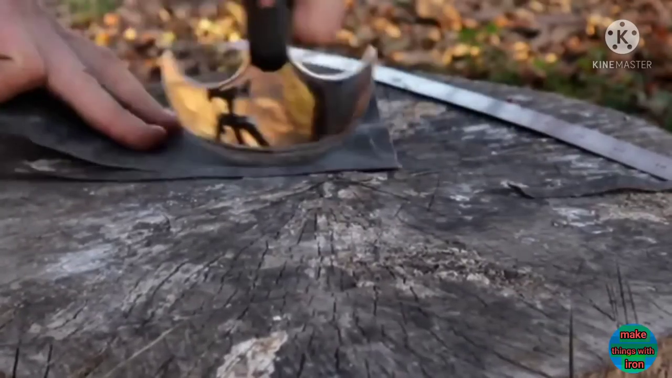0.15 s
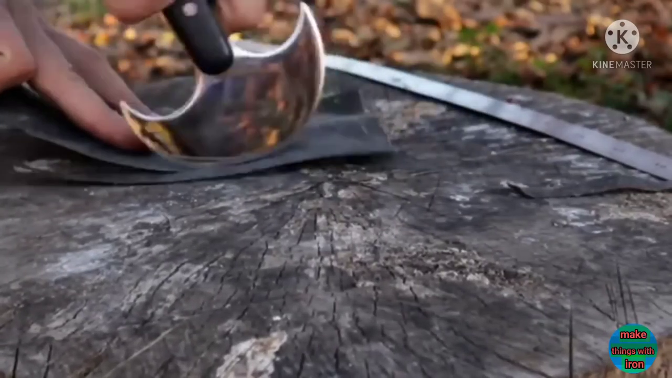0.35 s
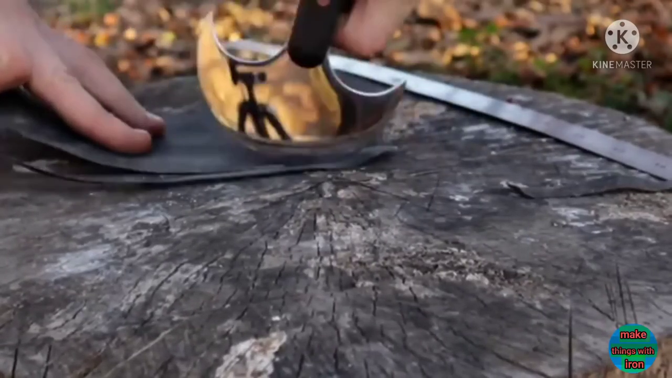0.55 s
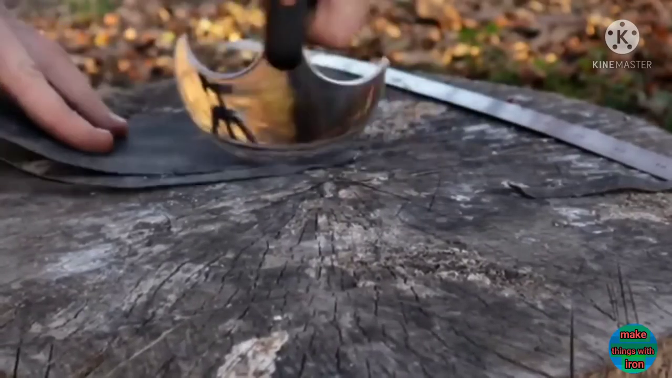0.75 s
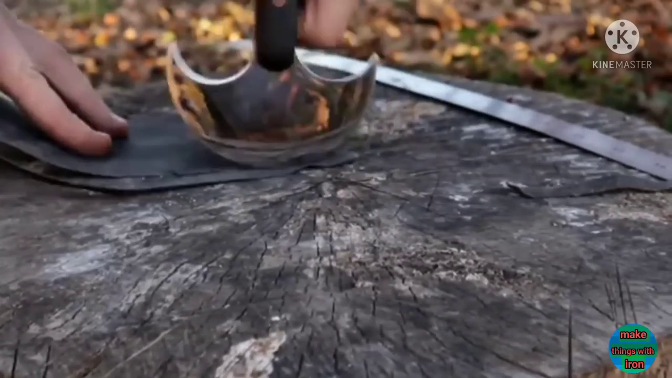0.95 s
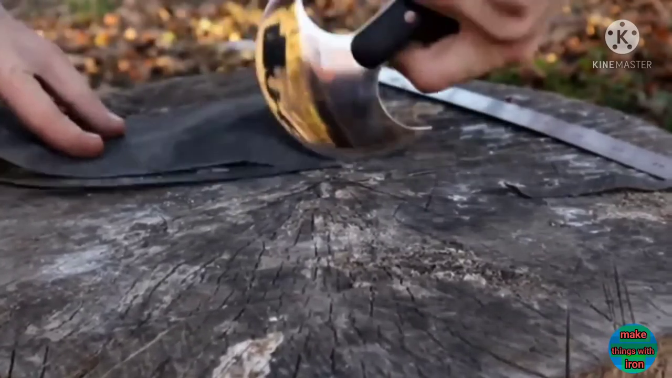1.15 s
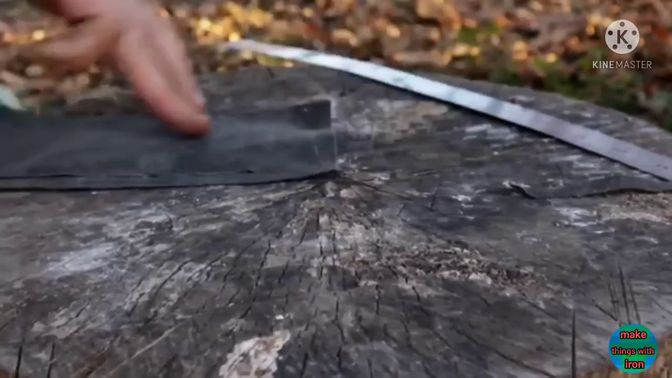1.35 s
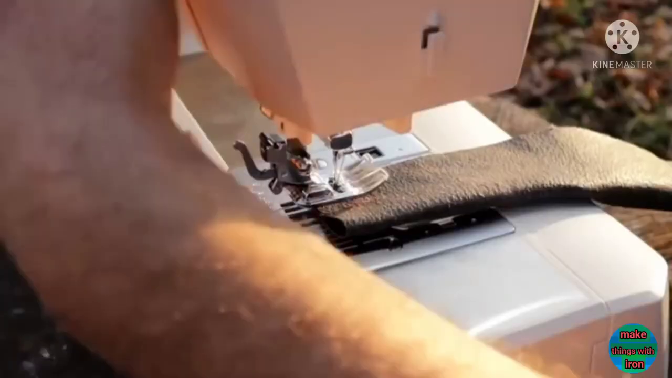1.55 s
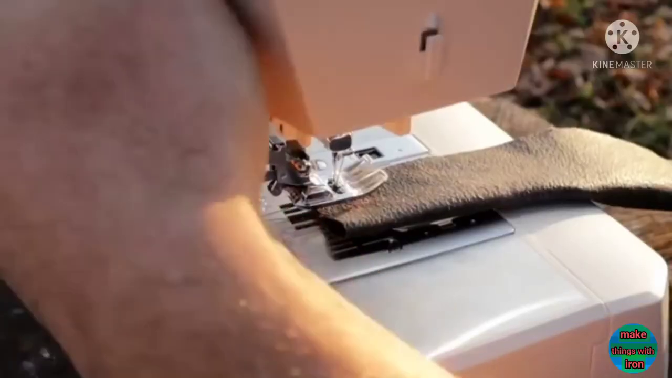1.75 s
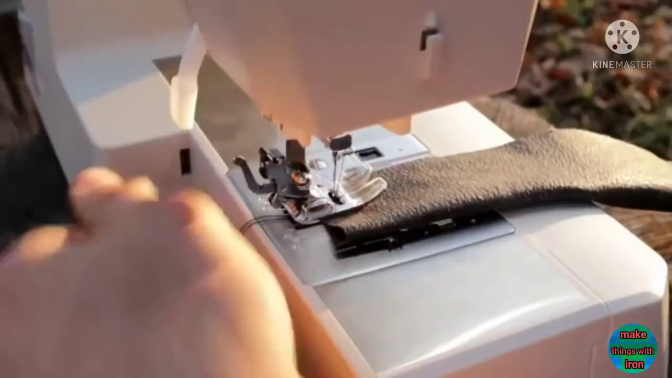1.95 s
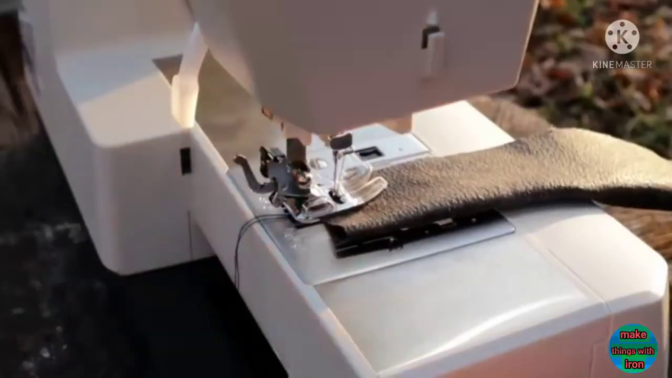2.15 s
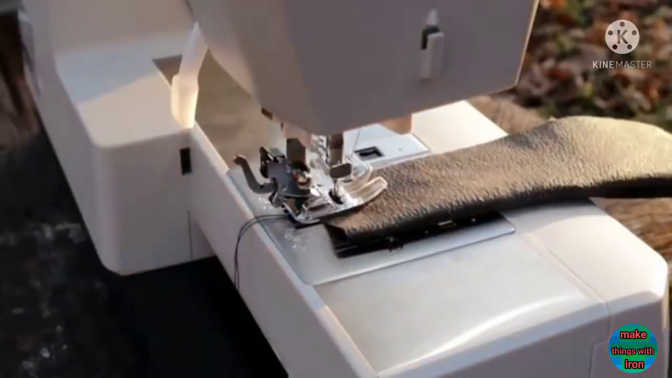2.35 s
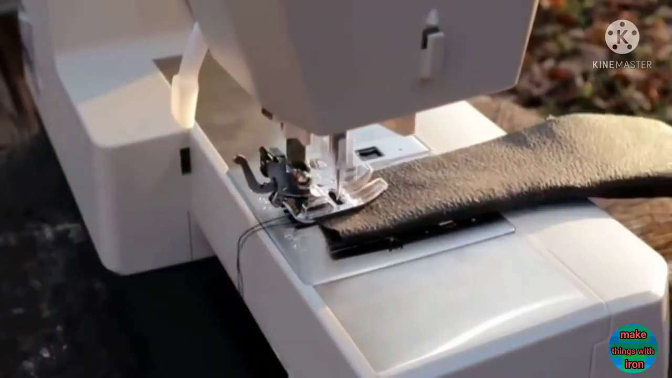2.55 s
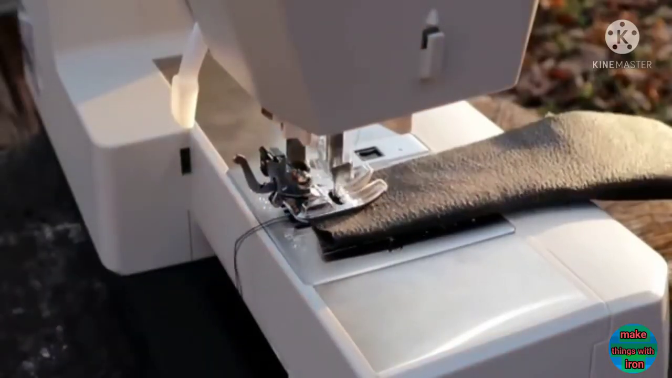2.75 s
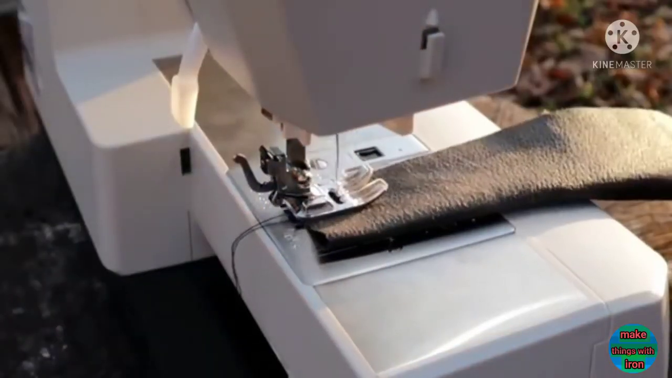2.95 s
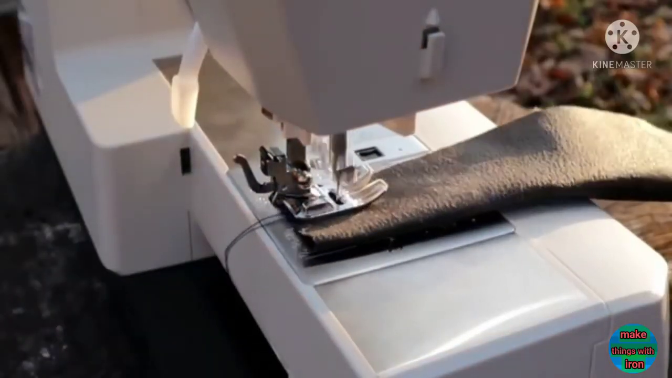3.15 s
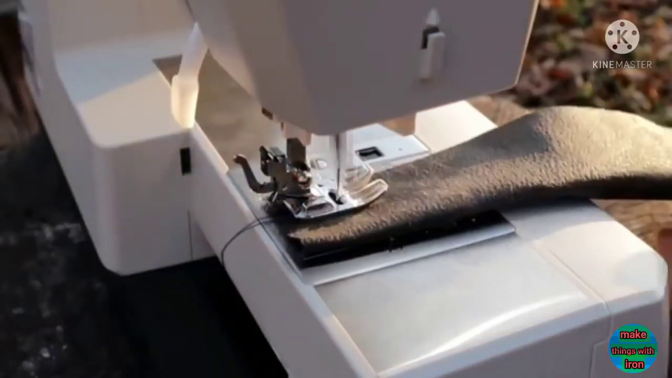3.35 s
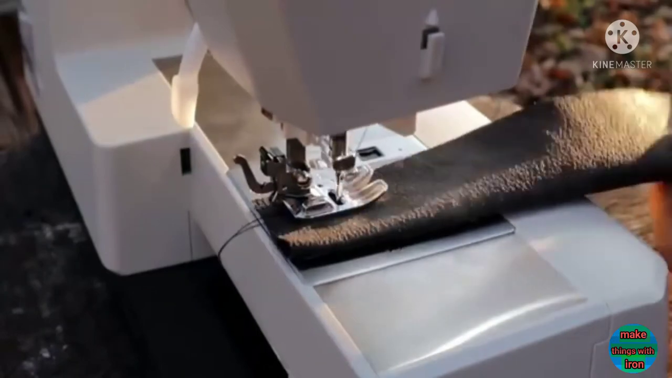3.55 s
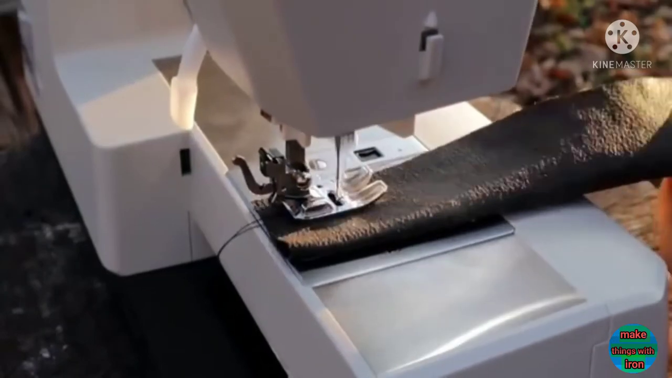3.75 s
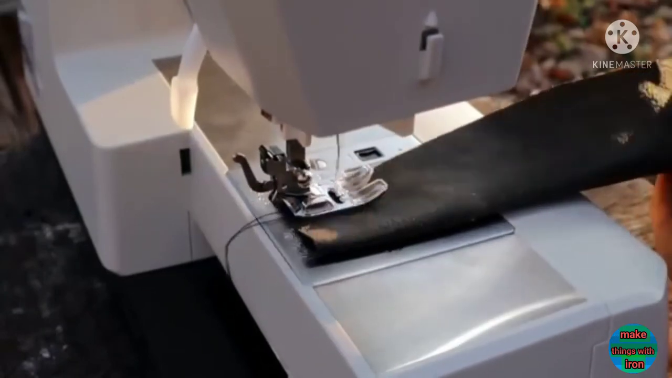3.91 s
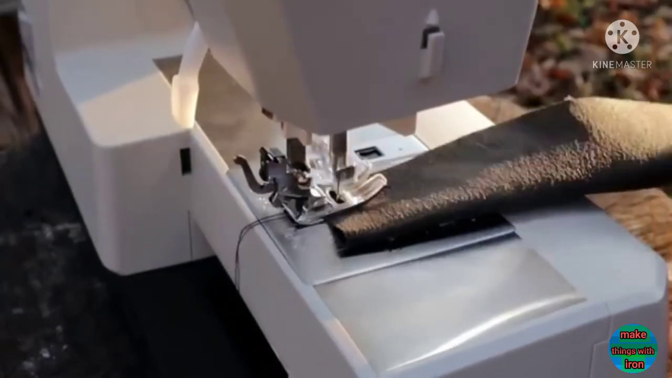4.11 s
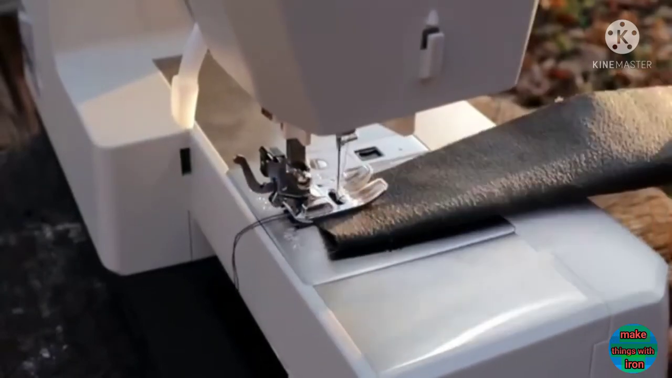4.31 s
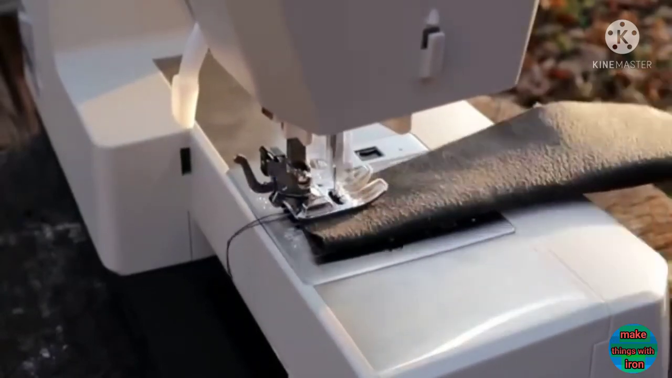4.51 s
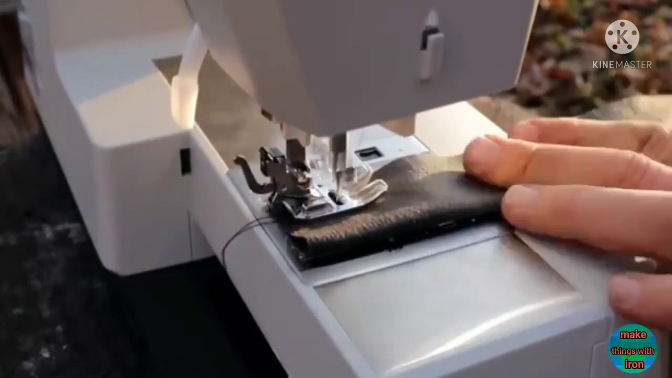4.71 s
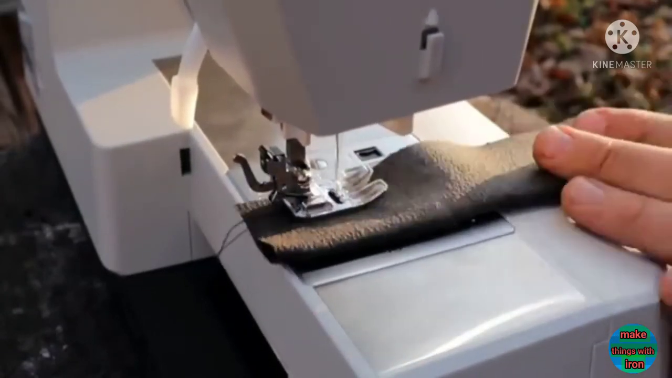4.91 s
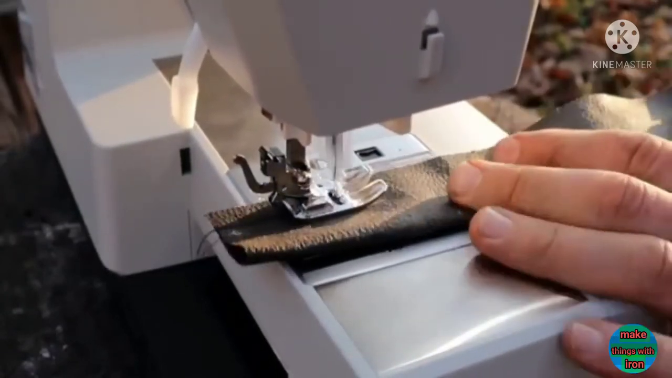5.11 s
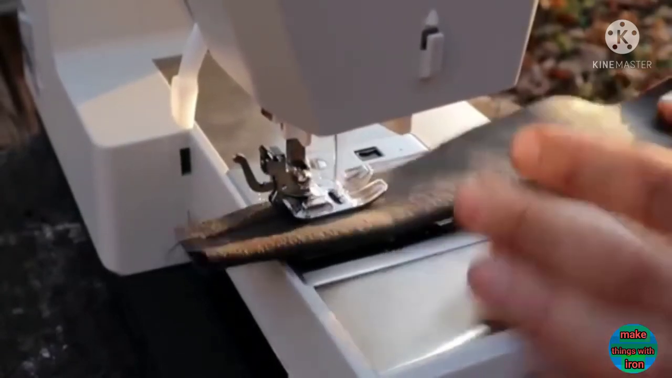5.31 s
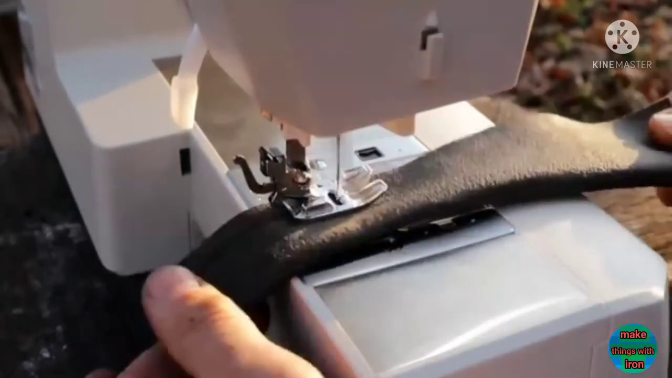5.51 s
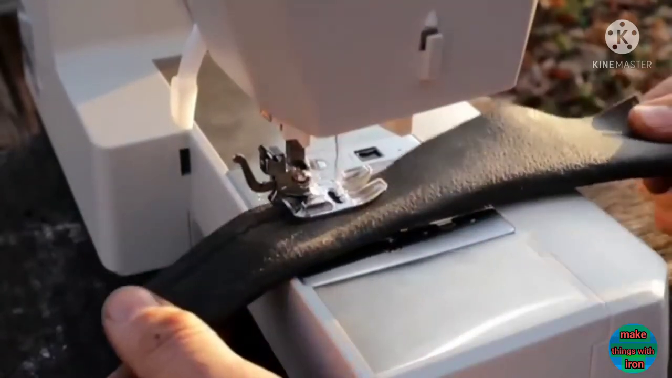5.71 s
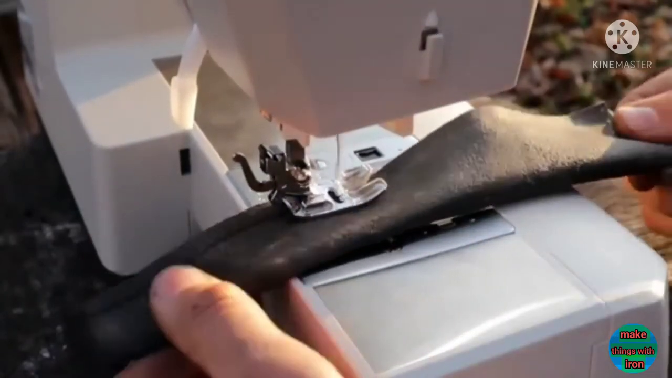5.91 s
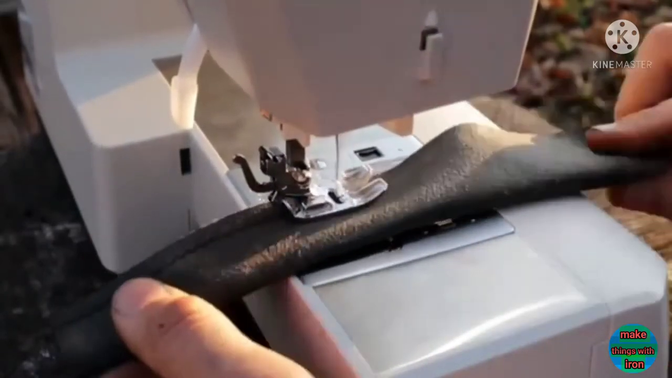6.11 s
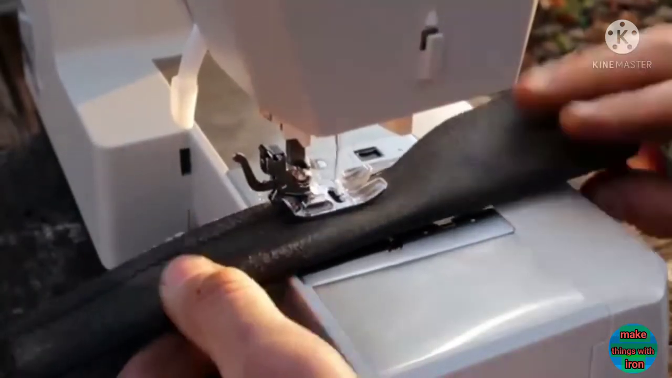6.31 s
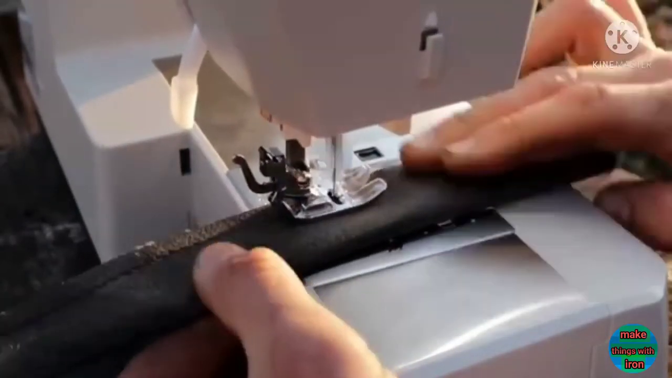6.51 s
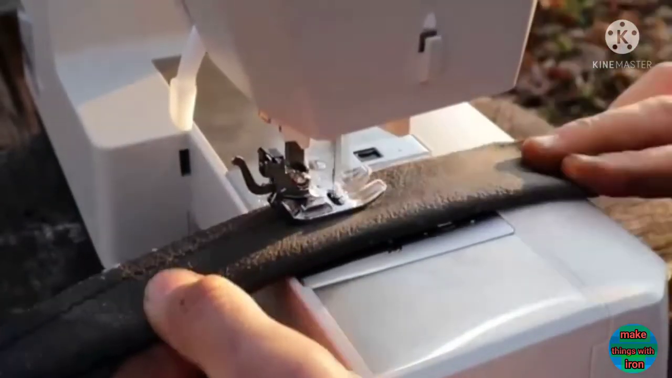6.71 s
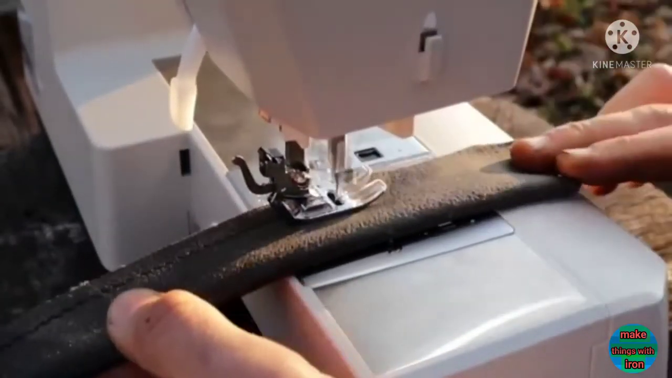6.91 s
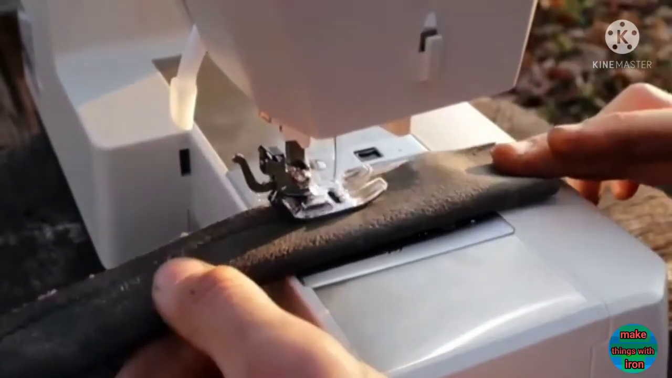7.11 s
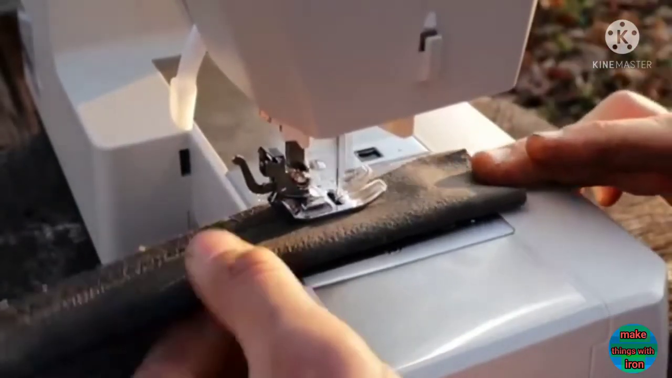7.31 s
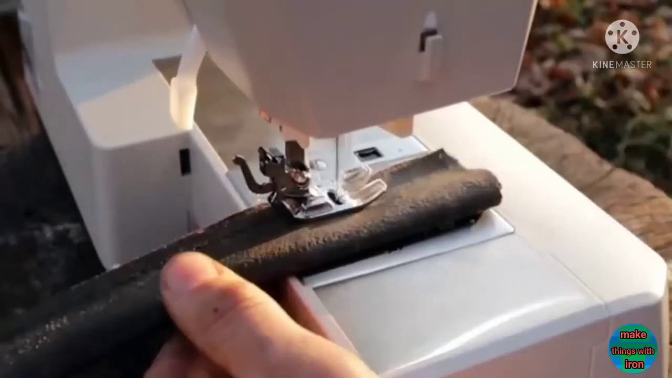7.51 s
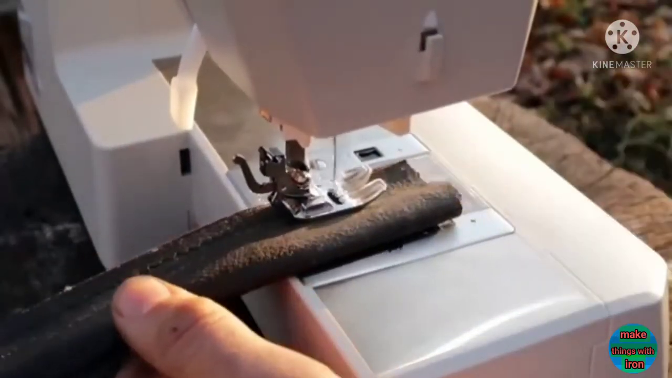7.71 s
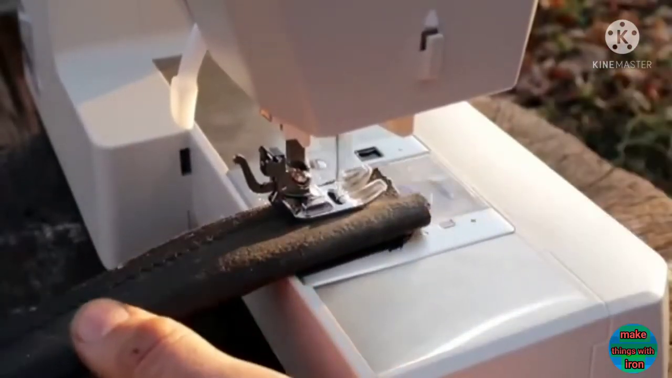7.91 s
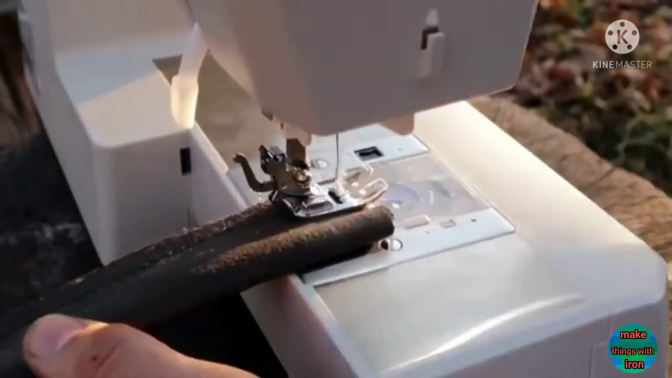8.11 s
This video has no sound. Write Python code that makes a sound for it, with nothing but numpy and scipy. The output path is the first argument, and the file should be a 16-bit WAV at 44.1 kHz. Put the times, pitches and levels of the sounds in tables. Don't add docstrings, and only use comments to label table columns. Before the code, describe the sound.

From 0 to 1.45 seconds, a blade makes quiet, grainy scrapes through leather, with small dry fibre snaps near 0.4 and 1.2, over soft outdoor hiss and distant rumble. A tiny falling bird chirp comes at 0.1. Then a faint far engine drones while hands tap and slide on plastic and leather rustles around 1.7-1.8. At 2.0 a presser lever snaps loudly in a quick hollow metal cluster. At 2.4 a sewing machine motor growls, rises and settles into whirring, throbbing clatter with sharp regular ticks, slowing at 3.6 and ending in a bright knock at 3.72. A second, shorter run lasts from 3.82 to about 4.3, with a strong knock at 4.25. After a brief restart at 4.46, the sound jumps at 4.54 to a sped-up run: dense, bright, higher-pitched rattling and a steady whine, stepping up slightly near 5.3 and continuing to 8.25.

```python
import sys
import numpy as np
from scipy import signal
from scipy.fft import rfft, irfft, next_fast_len
from scipy.io import wavfile
from scipy.ndimage import uniform_filter1d, map_coordinates

SR = 44100
rng = np.random.default_rng(int(sys.argv[2]) if len(sys.argv) > 2 else 0)


def gain_from_db(level_db):
    decades = np.asarray(level_db, float) / 20
    return 10 ** decades


def materialize(psi):
    bounded = np.clip(np.atleast_2d(psi).T, -1, 1)
    quanta = np.round(bounded * 32767).astype(np.int16)
    wavfile.write(sys.argv[1], SR, quanta)


N = 364266
KNIFE_END_S = 1.46
MACHINE_START_S = 2.4
FAST_START_S = 4.535
FAST_FACTOR = 2.332
TOP_HZ = 15020
FULL_EFFORT_DB = -28

# (pitch_hz, level_db)
RUMBLE_TONE = [(12, -31), (20, -9), (43, 0), (152, 5), (300, -2), (390, -6), (660, -120)]
HISS_TONE = [(120, -51), (200, -1.5), (572, 1.5), (933, -2), (1370, -2), (4050, -7.5), (7630, -14.5),
             (10000, -17), (13900, -16), (15200, -34)]
# (pitch_hz, likeness from -1 to 1)
LEFT_RIGHT_LIKENESS = [(60, 0.93), (180, 0.9), (550, -0.096), (1650, -0.097), (4970, -0.34), (15000, -0.69)]
# (time_s, level_db)
AIR_GAIN = [(0, 2), (.5, 1), (1.7, 2.5), (2.37, 3.5), (2.47, -11), (3.5, -14), (3.7, 1), (3.85, -4.5),
            (4.25, -18), (4.42, -7), (5.1, -9), (6, -7.5), (8.26, -10.5)]
# (time_s, pitch_hz, level_db)
FAR_ENGINE = [(1.46, 109.7, -68), (1.5, 113, -56), (1.7, 114, -65), (2.15, 115.7, -60), (2.39, 112, -71)]
# (time_s, pitch_hz, level_db)
CHIRP_PITCH = [(.09, 6730, -68), (.104, 6400, -54), (.116, 5950, -51), (.126, 5400, -52), (.142, 5000, -55),
               (.156, 4800, -64)]

# (start_s, level_db,
# pitch_hz)
BED_TAPS = [(1.807, -27, 1160), (1.81, -28, 850), (1.9978, -15, 1200), (2.0465, -24, 500),
            (2.294, -44, 480), (2.298, -41, 334), (2.302, -48, 720), (1.808, -30, 2070),
            (5.383, -44, 407), (5.383, -26.5, 1340), (5.83, -27, 519), (5.83, -25.5, 760)]
# (peak_s, length_s, level_db)
PALM_SLIDES = [
    (1.64, 0.02, -50),
    (1.68, 0.019, -54),
    (1.78, 0.055, -49),
    (1.83, .012, -49),
    (1.995, .004, -34),
    (2.305, 0.02, -52),
    (2.325, 0.016, -57),
    (2.36, 0.016, -52),
]
# (peak_s, length_s, level_db)
LEATHER_RUSTLES = [
    (1.69, .008, -55),
    (1.725, 0.03, -51.5),
    (1.782, 0.03, -43.5),
    (1.99, 0.01, -55),
    (2.33, .06, -61),
]

# (peak_s, length_s, level_db)
KNIFE_STROKES = [(.04, 0.035, -47.5), (.085, 0.017, -49.5), (.226, 0.047, -56.5), (.398, 0.065, -53),
                 (.5, 0.032, -55.5), (.592, 0.045, -54.5), (.735, 0.026, -50), (.765, 0.028, -46.5),
                 (.886, 0.056, -60), (1.014, 0.03, -53.5), (1.108, 0.047, -59), (1.18, 0.0018, -46),
                 (1.2, 0.062, -63), (1.35, 0.094, -52)]
# (start_s, level_db, pitch_hz)
FIBRE_SNAPS = [(0.0323, -38, 3260), (.074, -38, 3000), (0.3656, -42, 3520), (0.3935, -33, 3300),
               (.3935, -39, 650), (.394, -40, 1350), (0.4964, -42, 2900), (0.5867, -40, 3700),
               (0.615, -41, 2030), (0.8574, -44, 3550), (1.1773, -33, 4000), (1.1774, -34, 2200),
               (1.1772, -36, 1350), (1.177, -43, 620), (1.285, -44, 2000), (2.1394, -50, 2930)]
# (peak_s, length_s, level_db)
FIBRE_TEARS = [
    (.52, 0.033, -45.5),
    (1.35, .06, -61),
]

# (start_s, level_db, thud_db, decay_s)
LEVER_CONTACTS = [
    (1.806, -25.5, -2, 0.026),
    (1.9975, -17, -15, 0.03),
    (2.0027, -9.5, -9, 0.032),
    (2.0133, -14, 0, 0.033),
    (2.0193, -5, -9, 0.03),
    (2.0226, -11, -6, .03),
    (2.0271, -14, -5, 0.035),
    (2.046, -43.5, 8, 0.04),
    (2.074, -48, 8, 0.022),
]
# (pitch_hz, level_db, decay_s)
LEVER_MODES = [(500, -1, 0.15), (457, -10, 0.19), (695, -14, 0.14), (1100, -6, 0.05)]
# (start_s, level_db, pitch_hz)
LEVER_SPRING = [
    (2.021, -40, 2930),
]
# (start_s, level_db, pitch_hz)
LEVER_STOP = [
    (2.0195, -8, 6260),
    (2.0035, -11.5, 3680),
]

# (peak_s, length_s, level_db)
TABLE_SHUDDERS = [
    (3.68, 0.15, -57),
    (4.4, .06, -63),
    (4.95, 0.38, -61),
    (2.31, .03, -54),
]
# (time_s, pitch_hz, level_db)
TABLE_NOTE = [(2.45, 195, -70), (2.8, 198, -62.5), (3.5, 197, -63.5), (3.75, 190, -61), (4.1, 190, -68.5),
              (4.5, 190.5, -66)]
# (peak_s, length_s, level_db)
MOTOR_GROWLS = [
    (2.42, 0.018, -33.5),
    (3.835, 0.013, -33),
    (4.485, 0.019, -36),
]
# (peak_s, length_s, level_db)
CASING_BOOMS = [
    (3.18, 0.0051, -27),
    (3.282, 0.0069, -29),
    (3.32, 0.011, -23),
    (3.388, 0.0078, -24),
    (3.45, 0.0077, -35),
    (4.49, .02, -39),
]

# (time_s, commutator_hz, effort_db)
MOTOR_RUNS = [
    [(2.394, 700, -40.5), (2.47, 1047, -35), (2.55, 1560, -31), (2.64, 1898, -29.5), (2.8, 2159, -29),
     (3.18, 2406, -28), (3.33, 2530, -27.5), (3.45, 2570, -28), (3.555, 2420, -29), (3.625, 1880, -38.5),
     (3.65, 1800, -56)],
    [(3.65, 1204, -53), (3.812, 1213, -54), (3.82, 1003, -47), (3.86, 1150, -31.5), (3.94, 1600, -31),
     (4.02, 1802, -29.5), (4.13, 1960, -29), (4.262, 2047, -29.5), (4.28, 1600, -38.5), (4.32, 1300, -39.5),
     (4.39, 910, -65)],
    [(4.39, 593, -75), (4.457, 602, -71), (4.462, 663, -45), (4.5, 803, -37.5), (4.531, 940, -32.5),
     (4.536, 990, -60)],
]
# (time_s, commutator_hz, effort_db)
MOTOR_FAST = [(4.532, 2190, -38), (4.542, 2290, -30.5), (4.61, 3230, -26), (4.66, 3226, -29.5),
              (4.85, 3300, -28), (5.21, 3214, -28.5), (5.3, 3567, -28), (6.1, 3589, -27.5),
              (8.215, 3682, -29), (8.26, 3670, -46)]
# (pitch_hz, width_hz, lift_db)
COVER_NOTES = [(1280, 81, -4), (1600, 380, 5.5), (1960, 110, 6.5), (2220, 260, -3), (2550, 160, 8.5),
               (3300, 130, 8.5), (6000, 850, 16.5)]
# (time_s, pitch_hz, level_db)
COVER_HOWL = [(2.53, 1797, -52), (2.575, 1960, -39), (2.605, 2050, -37), (2.645, 1900, -37),
              (2.69, 2040, -46), (2.72, 2050, -55)]
# (time_s, pitch_hz, level_db)
START_SWEEP = [(4.534, 4550, -36), (4.562, 4900, -35), (4.58, 5600, -39), (4.6, 6000, -37),
               (4.63, 6250, -43)]
# (multiple of the belt's turning, level_db)
BELT_LINES = [(.267, -14), (.485, -19), (1.13, -6.5), (1.215, -8), (.82, -11)]
# (time_s, pitch_hz, level_db)
BELT_NOTE = [(4.56, 1037, -65), (5.2, 1077, -66), (5.29, 1223, -61), (6.05, 1258, -60.5), (7, 1254, -62),
             (7.75, 1288, -59.5), (8.22, 1280, -60)]
HUM_NOTE = [(4.6, 710, -66), (8.22, 688, -68.5)]

# (time_s, turns)
SHAFT_RUNS = [
    [(2.396, 0), (2.445, .5), (2.536, 1.52), (2.56, 1.85), (2.591, 2.52), (2.611, 2.85), (2.682, 4.52),
     (2.804, 7.52), (3.03, 13.52), (3.312, 21.52), (3.553, 28.52), (3.64, 30.2)],
    [(3.82, 31.3), (3.858, 31.8), (3.912, 32.52), (3.93, 32.85), (3.967, 33.52), (4.064, 35.52),
     (4.199, 38.52), (4.247, 39.52), (4.35, 41)],
    [(4.46, 41.5), (4.54, 42.7), (4.6, 44.7), (5.25, 68.8), (5.4025, 75), (6.124, 105), (7.09, 145),
     (7.567, 165), (8.27, 194.8)],
]
# (start_s, level_db, thud_db, decay_s, pitch_hz)
MECHANISM_KNOCKS = [(2.396, -20, -4, 0.028, 2600), (2.4104, -15, -9, 0.01, 2650),
                    (2.446, -18.5, -20, 0.014, 2600), (2.4923, -21.5, 3, 0.044, 2580),
                    (2.5355, -11.5, -22, 0.018, 2550), (2.592, -14, -20, 0.019, 2020),
                    (2.757, -9, -21, 0.031, 2700), (3.624, -25, -27, 0.031, 2780),
                    (3.6531, -34, -16, 0.034, 6090), (3.678, -23, 1, 0.034, 6200),
                    (3.665, -33, -20, .015, 7500), (3.716, -22, -25, 0.046, 2630),
                    (3.7205, -8.5, 0, 0.022, 6500), (3.822, -28.5, -1, 0.042, 2640),
                    (3.857, -19, -14, 0.048, 6270), (4.246, -7, -26, 0.048, 3260),
                    (4.259, -16, -22, 0.057, 3190), (4.372, -41, -6, 0.033, 6120),
                    (4.4423, -49, -25, 0.03, 2000), (4.4631, -31, -11, 0.038, 2800),
                    (4.5098, -20, 0, 0.018, 2540), (4.517, -31, 15.5, 0.017, 2000),
                    (4.525, -32, 16, .015, 2000)]
# (start_s, level_db)
NEEDLE_TICKS = [(2.6379, -17.5), (2.6823, -14), (2.724, -15.5), (2.8043, -13.5), (2.8404, -20),
                (2.8784, -13.5), (2.9197, -19), (2.9554, -19), (2.9935, -13.5), (3.029, -14), (3.0654, -28),
                (3.1007, -15.5), (3.1364, -17), (3.1726, -14), (3.2084, -21), (3.243, -15), (3.277, -20),
                (3.3109, -19), (3.3434, -25), (3.3784, -24), (3.4118, -14), (3.4471, -19), (3.4794, -15),
                (3.5143, -14), (3.5525, -25), (3.8796, -26), (3.9122, -15.5), (3.9672, -14),
                (4.0162, -17.5), (4.0631, -15.5), (4.109, -15), (4.1543, -14), (4.1989, -14.5),
                (4.2854, -28)]
SHUTTLE_TICKS = [(2.5596, -21), (2.6113, -22), (2.6614, -23), (2.7044, -20), (2.7382, -23), (2.776, -22),
                 (2.816, -20), (2.8539, -21), (2.8928, -22), (2.9314, -23), (2.968, -17), (3.0044, -17),
                 (3.0404, -26), (3.0769, -26), (3.1124, -26), (3.1484, -24), (3.1834, -34), (3.2186, -26),
                 (3.253, -25), (3.2874, -28), (3.3224, -23), (3.3554, -21), (3.3907, -22), (3.4234, -24),
                 (3.4574, -25), (3.4904, -20), (3.5255, -24), (3.5733, -21), (3.93, -16.5), (3.9823, -17.5),
                 (4.03, -21), (4.078, -16), (4.1225, -23), (4.1684, -24), (4.218, -19)]
# (pitch_hz, level_db, decay_s)
NEEDLE_MODES = [(4650, -10, 0.017), (5400, -12.5, 0.012), (5940, -12, 0.013), (9320, -18, 0.008)]
SHUTTLE_MODES = [(7070, -11, 0.04), (8570, -12.5, 0.014), (10020, -14, 0.019), (11550, -16, 0.014)]

# (pitch_hz, level_db)
SLOW_TONE = [(180, -26), (300, -10), (507, -11), (682, -11), (932, 8.5), (1150, 5.5), (1920, 5.5),
             (2260, 5), (2580, 3.5), (3950, -18), (4580, -12), (6160, -10), (11500, -20), (15200, -36)]
FAST_TONE = [(88, -78), (150, -39.5), (301, -30), (331, -39), (443, -32), (690, -25), (854, -21.5),
             (1230, -19), (1330, -22.5), (2200, 0), (2520, -3.5), (6250, -3.5), (9750, -14), (14100, -8),
             (15200, -8)]
# (pitch_hz, width_hz, lift_db)
CASING_NOTES = [(190, 800, 4), (898, 37, 5.5), (935, 270, 2), (988, 29, 6.5), (1518, 32, 3.5),
                (1950, 480, 3), (2645, 68, 6), (2940, 97, 4), (3690, 44, 6), (4420, 140, 3.5),
                (6080, 200, 2)]
# (pitch_hz, width_hz, lift_db)
SLOW_PANELS = [(1160, 85, -2), (5000, 300, -0.5), (5400, 150, 2), (7950, 200, 0), (9320, 150, 4),
               (9750, 200, -4), (10060, 150, 3), (10850, 300, 0), (11500, 250, 1.5), (12330, 250, -7),
               (12620, 150, 3), (13900, 250, -3), (14500, 200, 6)]
FAST_PANELS = [(1703, 86, -1.5), (2550, 115, 0), (3450, 150, -3.5), (3610, 150, 2), (3910, 210, -2.5),
               (4290, 200, 1), (4560, 140, -3), (5100, 150, 0.5), (5370, 250, -2.5), (7830, 170, 0),
               (7960, 150, 1.5), (9440, 350, 3.5), (10520, 200, 4), (14100, 200, 4)]
# (place in turns, level_db, decay_s)
SLOW_CONTACTS = [(.02, 7, .035), (.25, -3, .012), (.53, 4, .012), (.845, 9.5, .06)]
FAST_CONTACTS = [(.18, 5.5, 0.023), (.35, 2.6, 0.012), (.46, 10, 0.053), (.85, 6, .03), (.97, 11.2, 0.039)]
# (top edge at true speed_hz, level over full effort_db, growth with effort, bite of the contacts)
SLOW_LAYERS = [(1300, -1.5, 1.08, 0.0026), (3300, -0.5, 1.27, 0), (6500, -0.5, 2.18, 0.16),
               (20000, -4, 2.3, 0.49)]
FAST_LAYERS = [(1300, -2.5, 0.8, 0.22), (3300, 0, 0.44, 0.41), (20000, 1.57, 0.85, 0.59)]
# (peak_s, length_s, level_db)
LOOSE_HOOK = [
    (2.497, 0.0051, -35),
    (3.565, 0.027, -41),
    (3.638, .012, -56),
    (3.667, 0.0088, -49),
    (3.77, .05, -59.5),
    (3.84, 0.017, -56),
    (4.31, 0.028, -40.5),
    (4.43, .04, -66),
    (4.485, 0.022, -61),
]


def unit(x):
    return x / np.sqrt(np.mean(x ** 2) + 1e-20)


def along(points, hz):
    f, v = np.transpose(points)
    return np.interp(np.log(hz + 1), np.log(f + 1), v)


def curves(rows, off=None):
    s, *columns = np.transpose(rows)
    return [np.interp(np.arange(N) / SR, s, column, off, off) for column in columns]


def wobble(rate):
    points = rng.standard_normal(int(N * rate / SR) + 4)
    return map_coordinates(points, [np.arange(N) * rate / SR])


def filtered(x, response):
    m = next_fast_len(N + 8192)
    return irfft(rfft(x, m) * response(np.fft.rfftfreq(m, 1 / SR)), m)[..., :N]


def band(hz, lo_hz, hi_hz):
    return 1 / np.sqrt((1 + (lo_hz / (hz + 1)) ** 16) * (1 + (hz / hi_hz) ** 16))


def peaks(hz, modes):
    return 1 + sum((gain_from_db(db) - 1) / (1 + ((hz - c) * 2 / width) ** 2) for c, width, db in modes)


def pair(x, response):
    def mix(hz):
        angle = np.arccos(np.clip(along(LEFT_RIGHT_LIKENESS, hz), -1, 1)) / 2
        return response(hz) * [np.cos(angle), np.sin(angle)]
    mid, side = filtered(x, mix)
    return unit(np.array([mid + side, mid - side]))


def add(track, s, sound):
    part = track[round(s * SR):][:len(sound)]
    part += sound[:len(part)]


def strokes(rows):
    t = np.arange(N) / SR
    return sum(gain_from_db(db) * np.exp(-((t - s) / np.where(t < s, 0.92 * length, length)) ** 2)
               for s, length, db in rows)


def tone(rows, multiple=1, blur_hz=12, flutter_db=2.5, pace=250):
    hz = curves(rows)[0]
    db = curves(rows, off=-150)[1]
    phase = 2 * np.pi * np.cumsum(multiple * hz + blur_hz * wobble(pace)) / SR
    return gain_from_db(db + 7.0 + flutter_db * wobble(pace / 4)) * np.sin(phase)


def ticks(rows, cycles, grit):
    out, t = np.zeros(N), np.arange(SR // 3) / SR
    for s, db, hz in rows:
        note = np.sin(2 * np.pi * hz * t) + grit * rng.standard_normal(len(t))
        add(out, s, gain_from_db(db - 60 * t * hz / cycles) * note)
    return out


def air():
    gain_db, = curves(AIR_GAIN)
    wind_filter_db = -11.5 * (np.arange(N) > 2.7 * SR)
    rumble_db = -59 + 0.69 * gain_db + wind_filter_db + 2.2 * wobble(4) + 2 * wobble(11)
    hiss_db = -51.5 + gain_db + 0.81 * wobble(4.94)
    rumble = pair(rng.standard_normal((2, N)), lambda f: gain_from_db(along(RUMBLE_TONE, f)))
    hiss = pair(rng.standard_normal((2, N)), lambda f: gain_from_db(along(HISS_TONE, f)))
    return gain_from_db(rumble_db) * rumble + gain_from_db(hiss_db) * hiss


def far_engine():
    return tone(FAR_ENGINE, blur_hz=12, flutter_db=3.5, pace=40)


def bird():
    return tone(CHIRP_PITCH, blur_hz=260, flutter_db=3, pace=700) * gain_from_db([[2.5], [-2.5]])


def hands():
    taps = filtered(ticks(BED_TAPS, cycles=19.3, grit=.02), lambda f: band(f, 340, 3000))
    skin = gain_from_db(2.3 * wobble(90)) * rng.standard_normal(N)
    slide = unit(filtered(skin, lambda f: band(f, 420, 1230)))
    leather = gain_from_db(1.3 * wobble(200)) * rng.standard_normal(N)
    rustle = unit(filtered(leather, lambda f: band(f, 2800, 4700) + 0.11 * band(f, 1300, 14000)))
    return taps + slide * strokes(PALM_SLIDES) + rustle * strokes(LEATHER_RUSTLES)


def leather_grain():
    return gain_from_db(2.5 * wobble(300) + 0.43 * wobble(38.3)) * rng.standard_normal((2, N))


def knife():
    def body_tone(f):
        notes = sum(0.74 / (1 + ((f - hz) / 170) ** 2) for hz in (2050, 2750, 3750))
        return band(f, 1800, 4600) * (1 + notes)
    resting = gain_from_db(-74) * (np.arange(N) < KNIFE_END_S * SR)
    scrape = strokes(KNIFE_STROKES) + resting
    body = pair(leather_grain(), body_tone)
    fizz = pair(leather_grain(), lambda f: band(f, 5100, 18000) * 5000 / (f + 1))
    drag = scrape * body + gain_from_db(-56) * (scrape / gain_from_db(-53.5)) ** 0.58 * fizz
    drag = 0.45 * drag + 1.42 * drag.mean(0)
    tears = strokes(FIBRE_TEARS) * pair(leather_grain(), lambda f: band(f, 6200, 9300))
    snaps = ticks(FIBRE_SNAPS, cycles=17.0, grit=0.44)
    return drag + tears + filtered(snaps, lambda f: band(f, 450, 5500) + 0.12)


def lever():
    crack, thump, ring = np.zeros(N), np.zeros(N), np.zeros(N)
    t = np.arange(SR // 3) / SR
    for s, db, thud_db, t60 in LEVER_CONTACTS:
        add(crack, s, gain_from_db(db - 6.5 - 60 * t / t60) * rng.standard_normal(len(t)))
        add(thump, s, gain_from_db(db + thud_db + 9 - 60 * t / 0.063) * rng.standard_normal(len(t)))
        for hz, level, life in LEVER_MODES:
            mode_db = db + thud_db - 13.5 + level + rng.normal(0, 1.5)
            add(ring, s, gain_from_db(mode_db - 60 * t / life) * np.sin(2 * np.pi * hz * t))
    bright = filtered(crack, lambda f: 1.66 * band(f, 1900, 5500) + 0.19 * band(f, 7300, 20000))
    hollow = filtered(thump, lambda f: band(f, 430, 1460))
    stop = ticks(LEVER_STOP, cycles=36.0, grit=0.27)
    return ring + bright + hollow + stop + ticks(LEVER_SPRING, cycles=1170, grit=0)


def table():
    shudder = unit(filtered(rng.standard_normal(N), lambda f: band(f, 240, 620)))
    return shudder * strokes(TABLE_SHUDDERS) + tone(TABLE_NOTE, blur_hz=36.3, flutter_db=2.5, pace=99)


def motor_growl():
    rough = gain_from_db(3.4 * wobble(120)) * rng.standard_normal(N)
    return unit(filtered(rough, lambda f: band(f, 1670, 1660))) * strokes(MOTOR_GROWLS)


def casing_drum():
    drum = np.sin(2 * np.pi * np.cumsum(890 + 25 * wobble(60)) / SR)
    return unit(drum) * strokes(CASING_BOOMS)


def shaft_positions():
    return np.transpose(sum(SHAFT_RUNS, []))


def shaft():
    return uniform_filter1d(np.interp(np.arange(N) / SR, *shaft_positions()), size=1500)


def effort(runs, over_db, growth):
    loudest = np.max([curves(rows, off=-200)[1] for rows in runs], axis=0)
    return FULL_EFFORT_DB + over_db + growth * (loudest - FULL_EFFORT_DB)


def motor_whine():
    load = gain_from_db(4 * np.cos(2 * np.pi * (shaft() - .42)))
    slow = load * sum(tone(rows, blur_hz=35, flutter_db=1.8, pace=250) for rows in MOTOR_RUNS)
    fan = load * sum(tone(rows, 1.2, blur_hz=40, flutter_db=3) for rows in MOTOR_RUNS)
    slow += gain_from_db(4) * filtered(fan, lambda f: band(f, 1750, 2180))
    third = sum(tone(rows, 3, blur_hz=90, flutter_db=4, pace=400) for rows in MOTOR_RUNS)
    slow += gain_from_db(effort(MOTOR_RUNS, -10 - FULL_EFFORT_DB, growth=2.5)) * third
    fast = tone(MOTOR_FAST, blur_hz=22, flutter_db=1.5, pace=60)
    return filtered(gain_from_db(-16.5) * slow + gain_from_db(-21.5) * fast, lambda f: peaks(f, COVER_NOTES))


def brushes_and_fan():
    brushes = gain_from_db(-14) * tone(MOTOR_FAST, 3.92, blur_hz=260, pace=660)
    fan = gain_from_db(-20.5) * tone(MOTOR_FAST, 1.175, blur_hz=91.4, flutter_db=2.5, pace=220)
    howl = tone(COVER_HOWL, blur_hz=45, flutter_db=2.5, pace=300)
    return brushes + fan + howl + tone(START_SWEEP, blur_hz=150.0, pace=500)


def belt():
    lines = sum(gain_from_db(db) * tone(MOTOR_FAST, k * .346, blur_hz=10.98, flutter_db=4.0, pace=30)
                for k, db in BELT_LINES)
    own_note = tone(BELT_NOTE, blur_hz=9, flutter_db=1.2, pace=20)
    hum = tone(HUM_NOTE, blur_hz=3, flutter_db=1.2, pace=40)
    return gain_from_db(-33.5) * filtered(lines, lambda f: peaks(f, COVER_NOTES)) + own_note + hum


def knocks():
    crack, body, t = np.zeros(N), np.zeros(N), np.arange(SR // 4) / SR
    for s, db, thud_db, t60, hz in MECHANISM_KNOCKS:
        add(crack, s, gain_from_db(db - 9.5 - 60 * t / t60) * rng.standard_normal(len(t)))
        thud = gain_from_db(db + thud_db - 4.5 - 60 * (t / 0.023) ** 1.55) + gain_from_db(db + thud_db - 30 - 60 * t / 0.2)
        add(body, s, thud * np.sin(2 * np.pi * 950 * t) * (1 - np.exp(-t / 0.0025)))
        add(body, s, gain_from_db(db - 10.0 - 60 * t / t60) * np.sin(2 * np.pi * hz * t))
        add(body, s, gain_from_db(db - 38 - 60 * t / 0.26) * np.sin(2 * np.pi * 2660 * t))
    return body + filtered(crack, lambda f: 1.95 * band(f, 900, 8300) + 0.31 * band(f, 9900, 20000))


def steel_ticks(rows, modes, over_db, crack, lo_hz, hi_hz):
    out, t = np.zeros(N), np.arange(SR // 30) / SR
    for s, db in rows:
        for hz, level, t60 in modes:
            mode_db = db + over_db + level + 1.5 * rng.standard_normal()
            pitch = hz * (1 + rng.standard_normal() / 60)
            add(out, s, gain_from_db(mode_db - 60 * t / t60) * np.sin(2 * np.pi * pitch * t))
        add(out, s, crack * gain_from_db(db + over_db - 60 * t / 0.0067) * rng.standard_normal(len(t)))
    return filtered(out, lambda f: band(f, lo_hz, hi_hz) + 0.16)


def needle():
    return steel_ticks(NEEDLE_TICKS, NEEDLE_MODES, 2.7, crack=0.6, lo_hz=2600, hi_hz=9000)


def shuttle():
    rebounds = [(s + 0.0073, db - 5) for s, db in SHUTTLE_TICKS]
    return steel_ticks(SHUTTLE_TICKS + rebounds, SHUTTLE_MODES, 1.4, crack=0.47, lo_hz=4500, hi_hz=12600)


def clatter(contacts, speed, scatter_turns, attack_s):
    s, turns = shaft_positions()
    whole, t, power = np.arange(int(turns[-1])), np.arange(1500) / SR, np.zeros(N)
    for place, db, t60 in contacts:
        when = np.interp(whole + place + rng.normal(0, scatter_turns, len(whole)), turns, s)
        strength = gain_from_db(2 * (db + rng.normal(0, 1.3, len(whole))))
        blows = np.bincount((when * SR).astype(int), strength, N + SR)[:N]
        shape = gain_from_db(-120 * t * speed / t60) * (1 - np.exp(-t * speed / attack_s))
        power += signal.fftconvolve(blows, shape)[:N]
    return np.abs(power)


def stitching(runs, layers, spectrum, contacts, speed, beat, scatter_turns, attack_s, panels, loose=0):
    def colour(f):
        edge = 1.27 + 0.5 * band(f, 790 * speed, 30000 * speed)
        panel_db = sum(db / (1 + ((f - c) * 2 / width) ** 2) for c, width, db in panels)
        return gain_from_db(along(spectrum, f)) * peaks(f / speed, CASING_NOTES) * edge * gain_from_db(panel_db)
    hits, turns = clatter(contacts, speed, scatter_turns, attack_s), shaft()
    beats, beat_place, beat_db, once_place, once_db = beat
    throb_db = beat_db * np.cos(2 * np.pi * beats * (turns - beat_place))
    throb_db += once_db * np.cos(2 * np.pi * (turns - once_place)) + 0.65 * wobble(40)
    teeth = gain_from_db(1.6 * np.cos(16 * np.pi * turns))
    drives = [gain_from_db(throb_db), gain_from_db(0.75 * wobble(60)), teeth, teeth]
    edges_hz = np.array([20] + [row[0] for row in layers]) * speed
    out = np.zeros(N)
    for k, (drive, (_, db, growth, bite)) in enumerate(zip(drives, layers)):
        noise = drive * np.sqrt(1 + bite * hits) * rng.standard_normal(N)
        layer = unit(filtered(noise, lambda f: colour(f) * band(f, edges_hz[k], edges_hz[k + 1])))
        rattle = (k > 1) * loose * gain_from_db(db)
        out += layer * (gain_from_db(effort(runs, db, growth)) + rattle)
    return out


def slow_stitching():
    return stitching(MOTOR_RUNS, SLOW_LAYERS, SLOW_TONE, SLOW_CONTACTS, 1, beat=(3, .1, 2, .66, 2.2),
                     scatter_turns=.0013, attack_s=0.00072, panels=SLOW_PANELS, loose=strokes(LOOSE_HOOK))


def fast_stitching():
    return stitching([MOTOR_FAST], FAST_LAYERS, FAST_TONE, FAST_CONTACTS, FAST_FACTOR,
                     beat=(2, .24, 1.8, .3, .6), scatter_turns=0.03, attack_s=0.0021, panels=FAST_PANELS)


def spread(x):
    def side_tone(f):
        return 0.48 * band(f, 9100, 20000) * (f / 10000) ** 1.6 + 0.15 * band(f, 3900, 7000)
    return x + np.outer([1, -1], filtered(x * wobble(900), side_tone))


def scene():
    background = air() + far_engine() + bird()
    mechanism = filtered(needle() + shuttle() + knocks(), lambda f: band(f, 600, 21000))
    true_speed = (slow_stitching() + mechanism + lever()) * (np.arange(N) < FAST_START_S * SR)
    drive = motor_growl() + motor_whine() + brushes_and_fan() + belt()
    shaking = table() + casing_drum()
    return background + hands() + knife() + shaking + drive + spread(true_speed) + fast_stitching()


def drop_faint_treble(x):
    hz, t, z = signal.stft(x, SR, nperseg=1024)
    patches = rng.random((len(hz) // 10 + 1, len(t) // 4 + 1))
    luck = np.kron(patches, np.ones((10, 4)))[:len(hz), :len(t)]
    power = uniform_filter1d(np.abs(z[0]) ** 2, size=10, axis=0)
    calm = power < 2 * uniform_filter1d(power, size=21, axis=1)
    odds = .6 * np.clip((hz - 8000) / (TOP_HZ - 8000), 0, 1) ** 3
    allowed = (t < 4.5) & ((t < MACHINE_START_S) | (hz[:, None] > 12800))
    silent = calm & (luck < odds[:, None]) & allowed
    return signal.istft(z * ~silent, SR, nperseg=1024)[1][:, :N]


def band_limit(x):
    return signal.sosfilt(signal.butter(12, 16330, fs=SR, output="sos"), x)


def record(dry):
    def top_limit(hz):
        below = np.clip((TOP_HZ - hz) / 110, .05, 1)
        return np.where(hz < TOP_HZ, below, gain_from_db(-23 - (hz - TOP_HZ) / 9) + gain_from_db(-78))
    mid, side = dry.mean(0), (dry[0] - dry[1]) / 2
    loud = np.sqrt(np.abs(uniform_filter1d(mid ** 2, size=2000))) > gain_from_db(-33)
    loud &= np.arange(N) > MACHINE_START_S * SR
    side = side - loud * filtered(side, lambda f: (f > 700) & (f < 7600))
    side = side * (np.arange(N) < FAST_START_S * SR)
    both = filtered(mid + np.outer([1, -1], side), top_limit)
    finished = drop_faint_treble(both)
    return band_limit(finished)


dry = scene()
out = record(dry)
materialize(out)
```